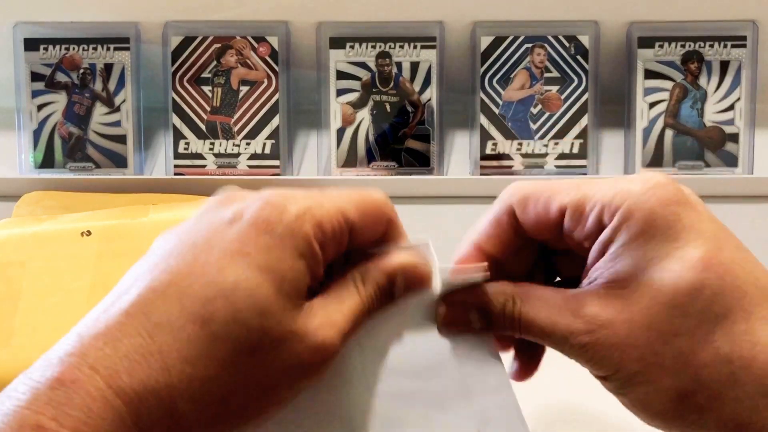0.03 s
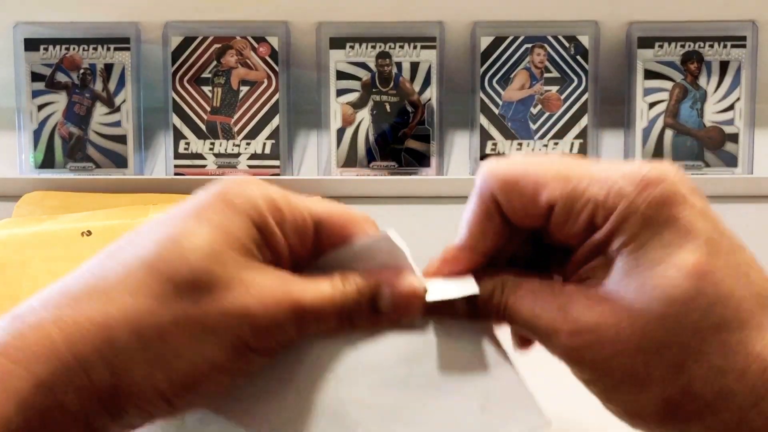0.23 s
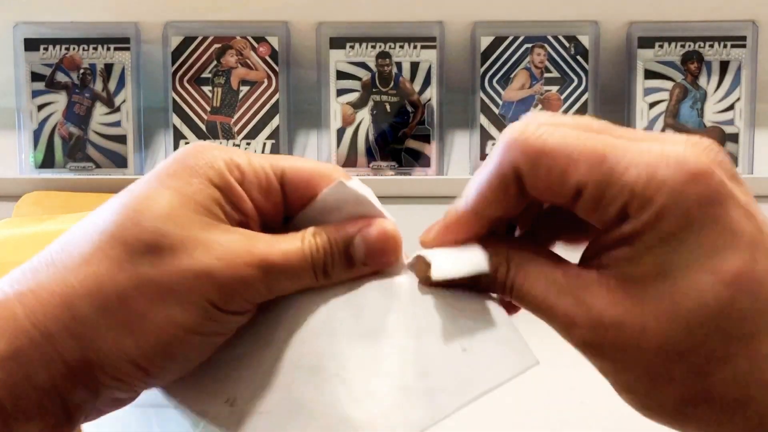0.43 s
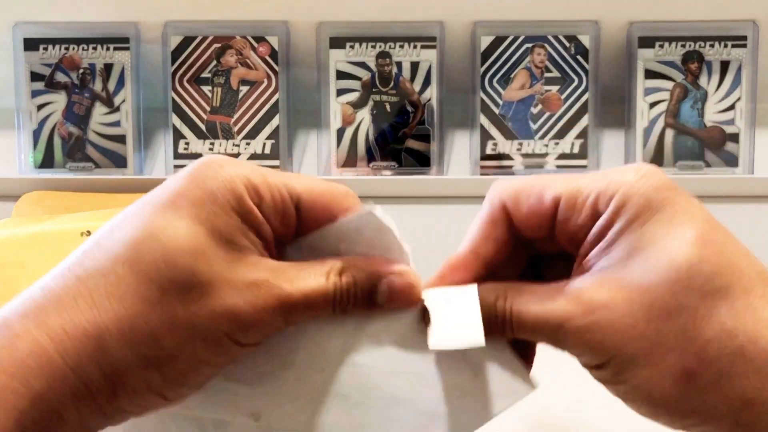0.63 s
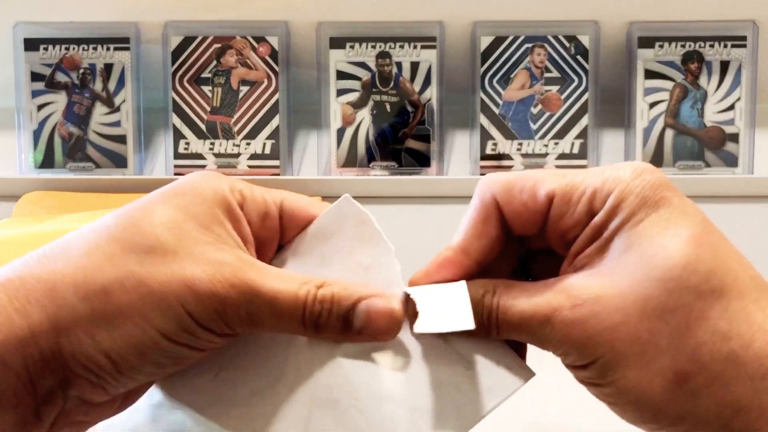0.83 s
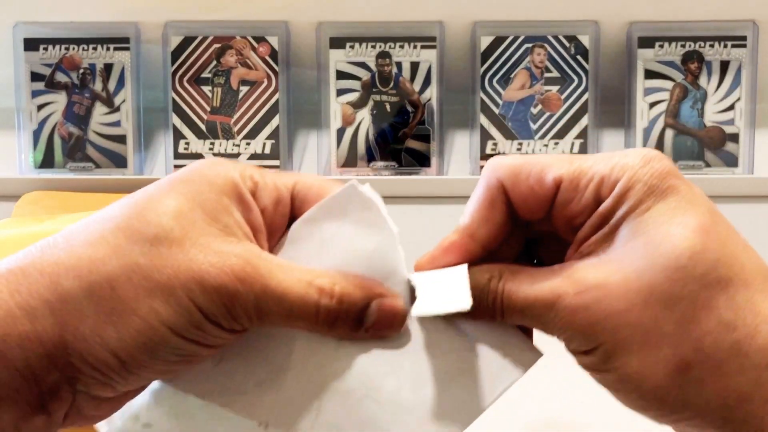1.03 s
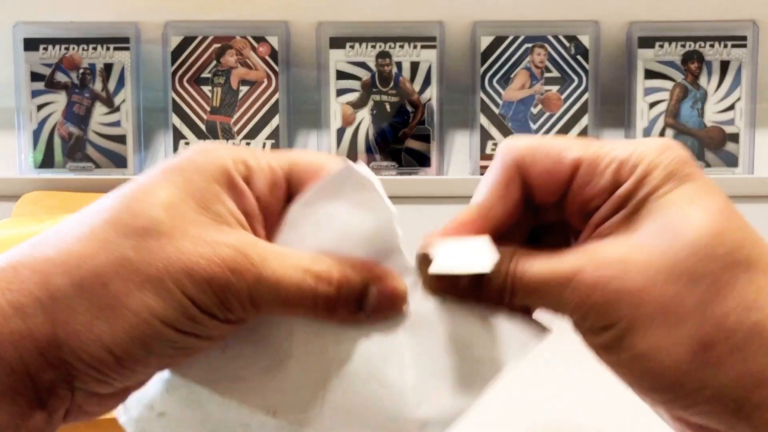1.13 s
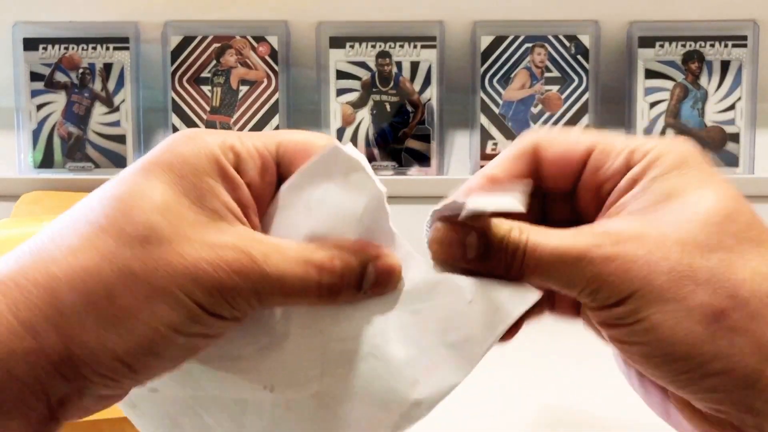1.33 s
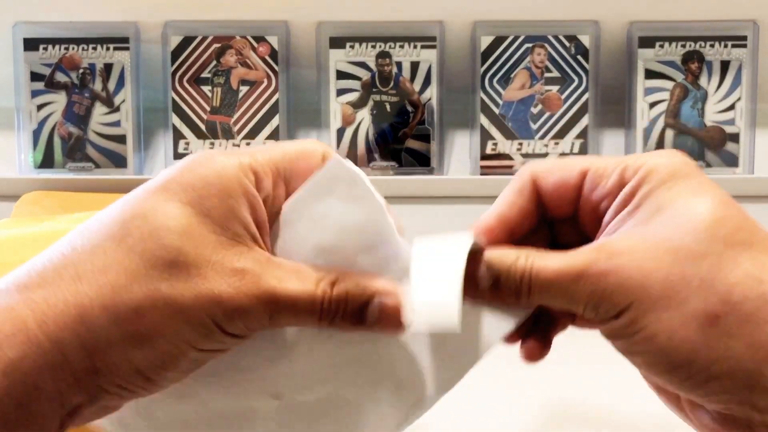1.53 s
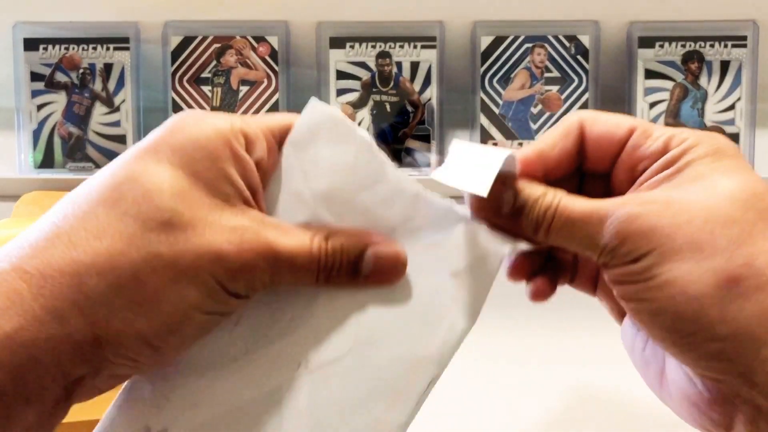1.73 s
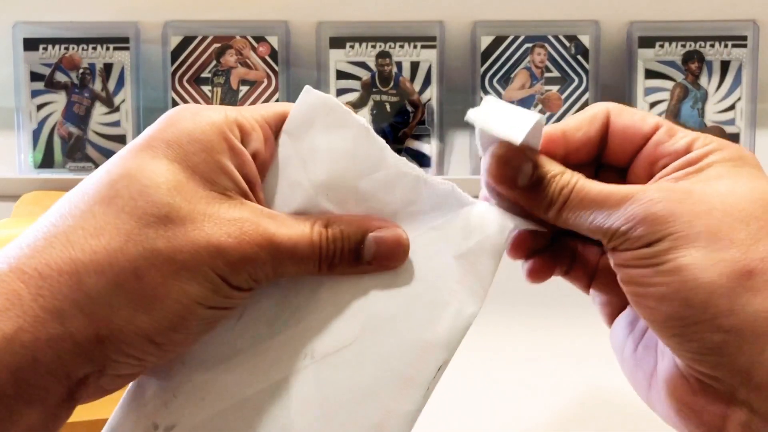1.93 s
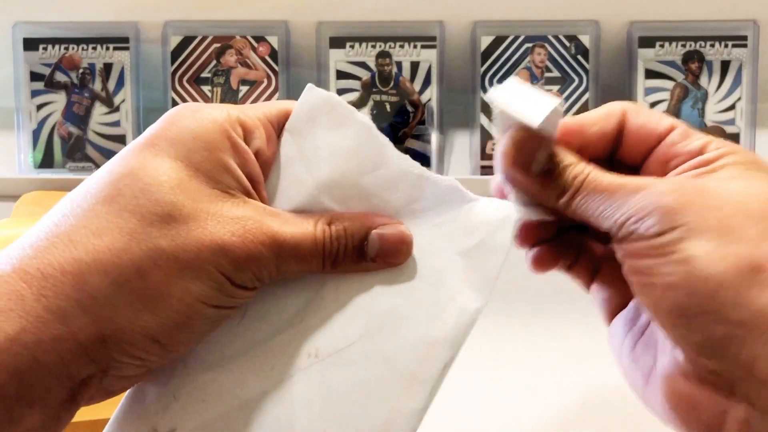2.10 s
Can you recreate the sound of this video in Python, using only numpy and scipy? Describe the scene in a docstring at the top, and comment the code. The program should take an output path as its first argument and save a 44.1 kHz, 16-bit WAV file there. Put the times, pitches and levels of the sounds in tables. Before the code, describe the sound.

A paper envelope is torn open by hand, close to the microphone: rustling and sharp snaps first, crisp short rips around one second, a quieter moment, then more crackles and a final burst of tearing, in a small room.

```python
"""Two hands tear a strip off a paper envelope, close to the microphone in a small room.
Mains hum, hiss and a slow rumble lie underneath throughout; fingers and paper slide from the first moment.
Dry ticks and sharp snaps of the sheet follow, each snap with a low flex; from 0.17 s fibres rip, short and
bright. A finger thumps the sheet softly at 1.42 s; a few snaps after 2 s and the room's tail come last.
Bursts of noise, ringing modes and dense coloured clicks make the paper; a wall echo and a tail, the room."""
import sys
import numpy as np
from scipy import signal
from scipy.fft import rfft, irfft, next_fast_len
from scipy.io import wavfile

SR = 44100
rng = np.random.default_rng(int(sys.argv[2]) if len(sys.argv) > 2 else 0)


def unload_wav(signal):
    """Save mono or channel-first audio to the path in sys.argv[1] as 16-bit WAV at rate SR, clipped to [-1, 1]."""
    wavfile.write(
        sys.argv[1],
        SR,
        np.round(np.clip(np.atleast_2d(signal).T, -1, 1) * 32767).astype(np.int16),
    )


N = 95432
T = np.arange(N) / SR

# colour of the sheet when shaken: [f/Hz, level/dB]
SHAKEN_SHEET = [(80, -28.5), (200, -3.5), (330, -3.5), (470, 1.5), (700, -4), (920, -1), (1200, -8.5),
                (1600, -2.5), (3000, -20.5), (8000, -71)]
# colour of breaking fibres, brightest at FIBRE_PEAK_HZ: [f/Hz, level/dB]
BREAKING_FIBRE = [(400, -31), (1200, -31.5), (1560, -4.5), (1950, -35), (2600, -13), (3500, -13),
                  (4100, -3.5), (4700, 1), (5500, -3), (6400, -4), (8300, 7), (9900, 4), (11000, -1),
                  (12800, -12), (15000, -10.5), (16500, -72)]
FIBRE_PEAK_HZ = 8300


def from_db(db):
    """Decibels to gain."""
    return 10 ** (np.asarray(db) / 20)


def rms_one(x):
    """Scale to unit rms."""
    return x / np.sqrt(np.mean(x ** 2) + 1e-20)


def one_ms(x):
    """Scale a burst to the energy of one millisecond at unit level."""
    return x / np.sqrt(np.sum(x ** 2) / (SR / 1000) + 1e-20)


def colour(x, points):
    """Causal (minimum-phase) filter through [f/Hz, level/dB] points."""
    size = 2 * next_fast_len(len(x))
    hz, db = np.transpose(points)
    bins = np.maximum(np.arange(size // 2 + 1) * SR / size, 1)
    level_db = np.interp(np.log(bins), np.log(hz), db)
    # folding the cepstrum onto positive time gives minimum phase
    cepstrum = irfft(np.log(from_db(level_db)))
    cepstrum[1:size // 2] *= 2
    cepstrum[size // 2 + 1:] = 0
    response = np.exp(rfft(cepstrum))
    return irfft(rfft(x, size) * response)[:len(x)]


def low_cut(x, hz):
    """A small sheet radiates little bass."""
    return signal.sosfilt(signal.butter(2, hz, "high", fs=SR, output="sos"), x)


def drift(rate_hz):
    """Smooth random wandering with unit rms: low-passed noise, its start-up dropped."""
    sos = signal.butter(2, rate_hz, fs=SR, output="sos")
    return rms_one(signal.sosfilt(sos, rng.standard_normal(2 * N))[N:])


def add(out, s, burst):
    """Mix a burst in at a time in seconds."""
    i = max(int(s * SR), 0)
    out[i:i + len(burst)] += burst[:N - i]


def grains(per_s, spread_db):
    """Clicks of random time and sign; their levels depart from 0 dB by an exponential chance."""
    sizes = from_db(spread_db * np.minimum(rng.exponential(1, N), 4))
    signs = rng.choice([-1, 1], N)
    return sizes * signs * (rng.random(N) < per_s / SR)


def crackle(per_s, spread_db, ring_s, count=14):
    """Tiny cracks at many spots of the paper; each spot rings briefly with a colour of its own."""
    t = T[:SR // 250]
    spots = rng.standard_normal((count, len(t))) * np.exp(-t / ring_s)
    return sum(np.convolve(grains(per_s / count, spread_db), one_ms(spot))[:N] for spot in spots)


def strokes(rows, attack_s, release_s):
    """Envelopes of the friction (sloping in dB) and of the sheet (level): attack, hold, release."""
    friction, sheet = 0, 0
    for start, end, first_db, last_db, sheet_db in rows:
        attack = np.clip((T - start) / attack_s + .5, 0, 1)
        gate = attack * np.exp(-np.maximum(T - end, 0) / release_s)
        friction = friction + gate * from_db(np.interp(T, [start, end], [first_db, last_db]))
        sheet = sheet + gate * from_db(sheet_db)
    return friction, sheet


def background():
    """Coloured noise for still air, a steady sine for mains hum, twice low-passed noise for the rumble."""
    # still air: [f/Hz, level/dB]
    air_tone = [(10, 8.5), (27, 14), (38, -6.5), (50, -4.5), (100, -13), (200, -19), (500, -22),
                (1500, -35), (5000, -32.5), (10000, -33), (16000, -44)]
    air_db, hum_hz, hum_db = -44, 117.5, -64.5
    rumble_hz, rumble_db = 8.6, -39  # level ahead of the second low-pass
    air = from_db(air_db) * rms_one(colour(rng.standard_normal(N), air_tone))
    rumble_sos = signal.butter(2, 2 * rumble_hz, fs=SR, output="sos")
    rumble = from_db(rumble_db) * signal.sosfilt(rumble_sos, drift(rumble_hz))
    hum = from_db(hum_db) * np.sqrt(2) * np.sin(2 * np.pi * hum_hz * T)
    return air + rumble + hum


def slides():
    """The paper's grain catches and slips under the fingers, and the bending sheet crinkles dully."""
    # paper and fingers slide; the faint run at 0.915 s is the sheet ringing:
    # [start t/s, end t/s, hiss level at start/dB, at end/dB, sheet level/dB]
    slide_runs = [(0, .027, -42, -46, -48), (.045, .088, -51, -46.5, -56.5), (.100, .200, -48.5, -43, -54),
                  (.205, .275, -41, -45.5, -51.5), (.280, .355, -61, -55, -57),
                  (.385, .505, -45.5, -48.5, -52.5), (.520, .660, -48.5, -53.5, -66),
                  (.665, .760, -48.5, -54.5, -78), (.770, .862, -45, -50.5, -60.5),
                  (.915, .985, -64, -77, -62), (.995, 1.140, -46, -42, -55.5),
                  (1.265, 1.288, -50.5, -45.5, -53.5), (1.292, 1.340, -48.5, -50.5, -53.5),
                  (1.398, 1.422, -57, -49.5, -67), (1.424, 1.500, -54, -45, -55),
                  (1.505, 1.625, -41.5, -45.5, -68), (1.645, 1.735, -71, -45, -81),
                  (1.740, 1.795, -48, -56, -71), (1.822, 1.862, -39, -57, -70)]
    # colour of sliding: [f/Hz, level/dB]
    slide_tone = [(400, -21), (1200, -4.5), (1600, -23), (2000, -5.5), (3400, -1.5), (4500, 5.5),
                  (5500, 5.5), (6600, 0), (9000, 9), (11000, 2.5), (13000, -6.5), (16000, -15.5)]
    rough_db = 3  # spread of the wandering strength
    hiss, sheet = strokes(slide_runs, attack_s=0.014, release_s=0.01)
    catches = crackle(per_s=4600, spread_db=1.5, ring_s=0.00011)
    catches = catches * from_db(rough_db * drift(rate_hz=33))
    crinkles = grains(per_s=650, spread_db=1)
    friction = hiss * rms_one(colour(catches, slide_tone))
    return friction + sheet * rms_one(colour(crinkles, SHAKEN_SHEET))


def ticks():
    """Dry ticks of lone fibres, and the bright part of the snap at 2.027 s, as short noise bursts."""
    # single fibres part; the row at 2.0271 s is the bright part of a snap: [t/s, level/dB]
    tick_rows = [(0.026, -46), (.0605, -37.5), (0.1108, -31), (.1518, -29), (.1586, -33), (.298, -38.5),
                 (.3964, -29.5), (0.597, -33), (.604, -34), (0.656, -31), (.730, -38.5), (0.7682, -37.5),
                 (0.861, -37), (1.008, -30), (1.0502, -18.5), (1.0547, -28), (1.094, -21), (1.0972, -28),
                 (1.476, -43), (1.537, -31), (1.5945, -37), (1.625, -36), (1.6288, -30), (1.6836, -26),
                 (1.721, -43), (1.7364, -28), (1.751, -23), (1.7627, -37), (1.7858, -32), (1.797, -23.5),
                 (1.816, -19.5), (1.8526, -32), (1.9412, -36), (1.956, -47), (1.967, -39), (1.994, -28),
                 (2.003, -22), (2.0271, -10.5)]
    decay_s = 0.001
    out, t = np.zeros(N), T[:SR // 50]
    for s, db in tick_rows:
        burst = rng.choice([-1, 1], len(t)) * np.exp(-t / decay_s)
        add(out, s, from_db(db) * one_ms(colour(burst, BREAKING_FIBRE)))
    return out


def snaps():
    """The paper snaps, and once a finger thumps the sheet softly: each a crack and a flex set off together."""
    # snaps of the paper, and a low finger thump at 1.4245 s:
    # [t/s, crack level/dB, treble tilt/dB per unit share, flex f/Hz, flex level/dB]
    snap_rows = [(0.043, -33, 0, 610, -43), (0.081, -33, -12, 664, -32), (0.1017, -40, -23, 1000, -33),
                 (0.1252, -17, 6, 1054, -26.5), (0.2013, -20.5, -4.5, 1050, -37),
                 (0.213, -34, -10, 674, -25.5), (0.2207, -33.5, -16, 563, -31.5),
                 (0.2405, -30.5, 2.5, 610, -51), (0.2891, -30.5, -6, 524, -28.5),
                 (0.2925, -33.5, -22, 1376, -36), (0.4286, -43, 3, 575, -29),
                 (0.443, -21.5, -3, 790, -26.5), (0.4704, -18.5, -2.5, 780, -26),
                 (0.491, -48, -12, 860, -34), (0.511, -11.5, 0, 960, -25), (0.5172, -21, -5.5, 880, -20.5),
                 (0.5486, -40, -22, 805, -34), (0.613, -29, -5.5, 780, -43), (0.6215, -30, 10, 940, -37.5),
                 (0.6253, -26.5, -7, 840, -35), (0.6289, -30.5, -28, 740, -29),
                 (0.6596, -26.5, 0.5, 926, -50), (0.6796, -35, -2, 810, -48), (0.703, -30, 0.5, 860, -50),
                 (0.7981, -41.5, -41, 1060, -40.5), (0.8224, -27, -29, 920, -33),
                 (0.8308, -31, -6, 814, -29.5), (0.8433, -26.5, 3, 1020, -26.5),
                 (0.8789, -33.5, -30, 740, -27), (0.8933, -13.5, 0, 1020, -27), (0.9004, -26, -3, 714, -33),
                 (0.9096, -21.5, -6.5, 694, -21), (0.986, -29.5, -3.5, 796, -30),
                 (1.0009, -25, -3, 700, -25), (1.0217, -28.5, -11, 810, -26.5),
                 (1.0399, -33, -2, 870, -23.5), (1.0647, -31, -2, 360, -37), (1.0684, -37, -12, 320, -30),
                 (1.0904, -20, 10.5, 590, -32.5), (1.1146, -20.5, 23, 795, -31.5),
                 (1.1354, -30, 14, 805, -39), (1.1959, -35, 0, 1200, -44), (1.2923, -49, -18, 487, -34),
                 (1.3244, -40, 21, 790, -36.5), (1.4244, -34, 6.5, 815, -30), (1.4245, -52, -15, 178, -40),
                 (1.448, -40.5, -31, 940, -36.5), (1.465, -40, 26, 450, -38), (1.4714, -51, 13, 490, -34),
                 (1.498, -29, 9, 716, -32), (1.516, -31, 3, 700, -27), (1.5203, -24.5, -6, 405, -24),
                 (1.5331, -33, -2, 770, -31), (1.5411, -37, -9, 864, -30), (1.557, -25, 4, 760, -37),
                 (1.5808, -32.5, 7, 820, -35.5), (1.6091, -31.5, 8, 860, -39.5),
                 (1.6349, -10, -3, 880, -28), (1.8839, -44.5, -23, 455, -37.5),
                 (2.0272, -15, -8.5, 1080, -24), (2.0478, -28.5, -8.5, 716, -27),
                 (2.063, -26, -6, 606, -29)]
    out = np.zeros(N)
    for s, crack_db, tilt_db, flex_hz, flex_db in snap_rows:
        add(out, s, from_db(crack_db) * crack(tilt_db) + from_db(flex_db) * flex(flex_hz))
    return out


def crack(tilt_db):
    """A millisecond noise burst with little bass; the tilt makes soft folds dull and sharp ones bright."""
    # colour of a crack: [f/Hz, level/dB]
    crack_tone = [(300, -10), (1150, -21.5), (1560, -2.5), (1950, -11), (2300, -8), (3100, -6.5),
                  (3800, -1.5), (4550, 4.5), (5500, 3), (6700, -3), (8800, 3), (10500, -4), (12500, -13.5),
                  (16000, -26)]
    rise_s, decay_s, tail_s, tail_db = 0.00022, 0.00083, 0.0027, -10
    t = T[:SR // 20]
    fall = np.exp(-t / decay_s) + from_db(tail_db) * np.exp(-t / tail_s)
    envelope = fall * (1 - np.exp(-t / rise_s))
    burst = colour(rng.choice([-1, 1], len(t)) * envelope, crack_tone)
    # two treble shelves, each an octave wide, with their shares of the tilt
    for shelf_hz, share in [(6500, 1), (3400, 0.79)]:
        burst = colour(burst, [(shelf_hz / np.sqrt(2), 0), (shelf_hz * np.sqrt(2), share * tilt_db)])
    return one_ms(low_cut(burst, hz=464))


def flex(centre_hz):
    """A short wobble of the sheet; the size of the moving patch favours the modes near one pitch."""
    # modes of the held sheet: [f/Hz, level/dB, t60/s]
    sheet_modes = [(194, -10, 0.029), (314, -13, 0.029), (401, -7, 0.046), (471, 5, 0.021), (602, 0, 0.031),
                   (858, 1, 0.027), (954, 3.5, 0.025), (1280, -16, 0.029), (1596, 7, 0.016),
                   (2223, 3, 0.032)]
    scatter_db, focus_db = 4, 8  # chance of each mode; loss at one octave from the centre
    detune_share, swell_s = 0.038, 0.00076
    t = T[:SR // 20]
    hz, mode_db, t60 = np.transpose(sheet_modes)[:, :, None]
    strength, detune, side = rng.standard_normal((3, len(sheet_modes), 1))
    focus = focus_db * np.log2(hz / centre_hz) ** 2
    gains = np.sign(side) * from_db(mode_db + scatter_db * strength - focus)
    waves = np.sin(2 * np.pi * hz * (1 + detune_share * detune) * t)
    modes = gains * waves * np.exp(-np.log(1000) * t / t60)
    swell = 1 - np.exp(-t / swell_s)
    return one_ms(low_cut(modes.sum(axis=0) * swell, hz=225))


def rips():
    """Fibres break in a clump at each slip and shake the sheet; their ring shifts with each pull's tension."""
    # runs of tearing: [start t/s, end t/s, fibre level at start/dB, at end/dB, sheet level/dB,
    # brightest ring of the fibres f/Hz]
    rip_runs = [(0.173, 0.246, -40, -43, -62, 8700), (1.037, 1.056, -33, -29, -49, 8000),
                (1.062, 1.1, -41, -29, -45, 8270), (1.108, 1.119, -43, -30, -45, 8500),
                (1.51, 1.556, -31, -43, -47, 8400), (1.795, 1.824, -25.5, -35.5, -53, 8830),
                (1.981, 1.994, -36.5, -31, -57, 8500), (1.997, 2.031, -28, -27.5, -46.5, 8400),
                (2.032, 2.064, -26.5, -27, -44, 8300)]
    out = np.zeros(N)
    # the negative spread makes most fibres strong and a few weak
    breaks = crackle(per_s=6000, spread_db=-1.5, ring_s=0.00023) * slips()
    shaken = rms_one(colour(breaks, SHAKEN_SHEET))
    for *run, ring_hz in rip_runs:
        fibres, sheet = strokes([run], attack_s=0.0058, release_s=0.0036)
        taut = [(hz * ring_hz / FIBRE_PEAK_HZ, db) for hz, db in BREAKING_FIBRE]
        out += fibres * rms_one(colour(breaks, taut)) + sheet * shaken
    return out


def slips(count=2000):
    """The tear sticks and slips: each jerk starts at once and dies away until the next."""
    slips_per_s, decay_s, jitter, rough_db = 280, 0.0033, 0.6, 1.5  # rate ahead of the jitter
    gaps = (1 + jitter * rng.uniform(-0.87, 1, count)) / slips_per_s
    starts = np.cumsum(gaps) - gaps[0]
    sizes = from_db(rough_db * rng.standard_normal(count))
    last = np.searchsorted(starts, T, side="right") - 1
    return sizes[last] * np.exp(-(T - starts[last]) / decay_s)


def room(x):
    """One wall echo and a short diffuse tail of decaying noise."""
    # colour of the room's answer: [f/Hz, level/dB]
    room_tone = [(100, -4.5), (500, -0.5), (1000, 0.5), (2500, 0.5), (5000, -5.5), (9000, -4), (16000, -14)]
    t60_s, delay_s, wall_s = 0.42, 0.01, 0.017
    tail_db, wall_db = -12.5, -23  # levels ahead of the colour
    tail = rng.standard_normal(N) * np.exp(-np.log(1000) * T / t60_s) * (T > delay_s)
    tail *= from_db(tail_db) / np.sqrt(np.sum(tail ** 2))
    add(tail, wall_s, from_db([wall_db]))
    return colour(signal.fftconvolve(x, tail)[:N], room_tone)


def scene():
    """The paper, its room and the background; two independent draws feed the room for a smoother tail."""
    friction = rips() + slides()
    direct = snaps() + ticks() + friction
    second_draw = snaps() + ticks() + friction  # heard only by way of the room
    answer = (room(direct) + room(second_draw)) / np.sqrt(2)
    return (direct + answer + background())[None]


def record(dry):
    """The top is cut steeply by an elliptic low-pass."""
    cutoff_hz = 16250
    return signal.sosfilt(signal.ellip(10, .1, 80, cutoff_hz, fs=SR, output="sos"), dry)


dry = scene()
out = record(dry)
unload_wav(out)
```